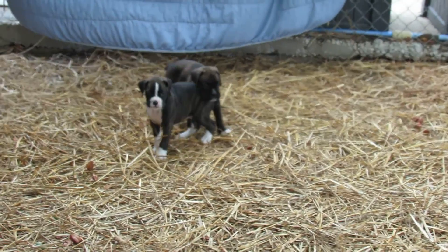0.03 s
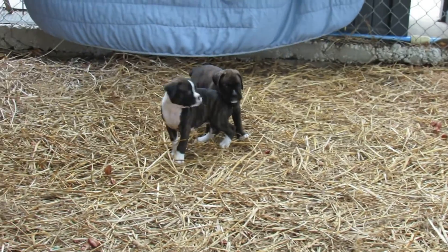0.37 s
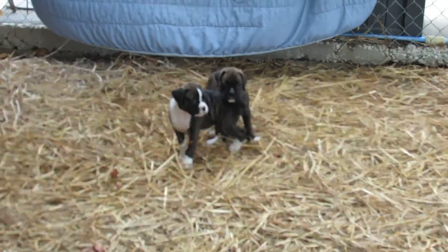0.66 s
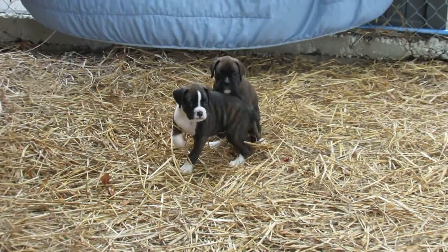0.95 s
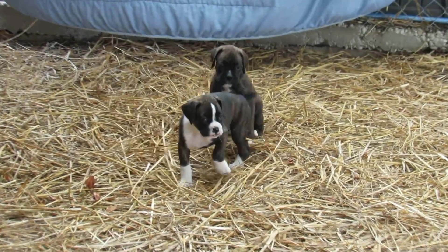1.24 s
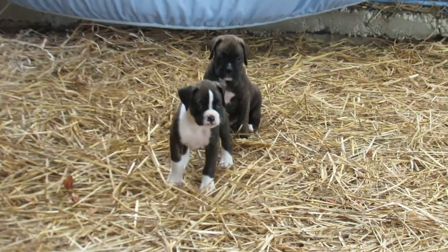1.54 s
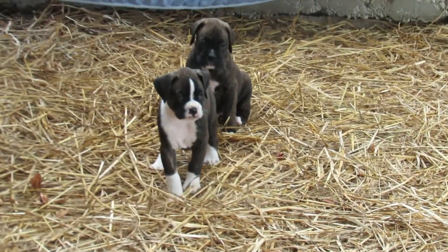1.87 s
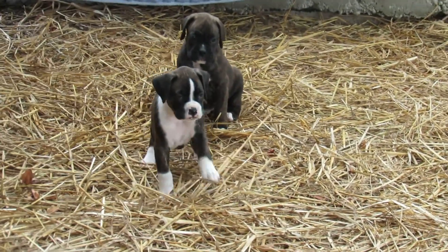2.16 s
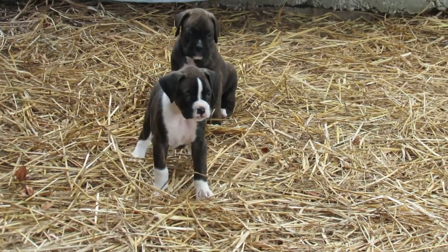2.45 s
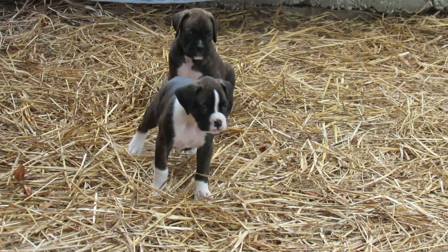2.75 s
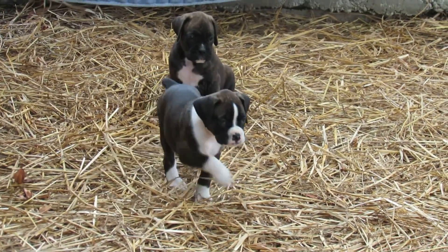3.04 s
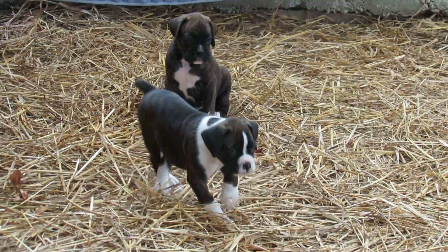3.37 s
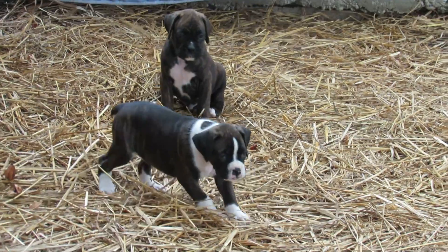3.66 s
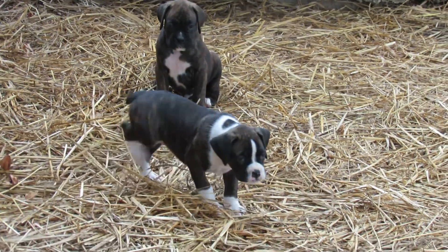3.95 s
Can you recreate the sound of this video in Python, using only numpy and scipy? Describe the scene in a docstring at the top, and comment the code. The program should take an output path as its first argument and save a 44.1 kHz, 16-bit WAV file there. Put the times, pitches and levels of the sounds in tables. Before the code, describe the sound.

Straw rustles and crackles under the paws of two puppies in an outdoor pen, growing louder near the end. Gusts of wind rumble and thump on the microphone, and a small bird nearby gives two sharp, high chirps.

```python
"""Two puppies pad over loose straw in an outdoor pen: each paw drags stalks into a crackling hiss.
A few stalks snap and there are three light knocks. Gusts sweep eddies over the microphone, which
rumbles and thumps. A small bird nearby gives two sharp, high chips, each a rising tone; faint
falling whistles and hoarse low calls sound farther off, over a soft wash of open air."""
import sys
import numpy as np
from scipy import signal
from scipy.fft import rfft, irfft
from scipy.io import wavfile
from scipy.ndimage import uniform_filter1d, map_coordinates

SR = 44100
rng = np.random.default_rng(int(sys.argv[2]) if len(sys.argv) > 2 else 0)


def pcm_store(signal):
    """Save signal as 16-bit PCM."""
    levels = np.round(np.clip(np.atleast_2d(signal), -1, 1) * 32767)
    wavfile.write(sys.argv[1], SR, levels.astype(np.int16).T)


N = 176400
T = np.arange(N) / SR


def amp(db):
    """Decibels to gain."""
    return 10 ** (np.asarray(db) / 20)


def unit(x):
    """Scale to unit rms."""
    return x / np.sqrt(np.mean(x ** 2) + 1e-20)


def log_interp(points, hz):
    """Interpolate (frequency [Hz], value) points on a log-frequency axis."""
    knots_hz, values = np.transpose(points)
    return np.interp(np.log(hz + 1), np.log(knots_hz), values)


def add(mix, start_s, sound):
    """Mix a sound in at start_s, trimmed to fit."""
    at = round(start_s * SR)
    sound = sound[..., max(-at, 0):]
    part = mix[..., max(at, 0):][..., :sound.shape[-1]]
    part += sound[..., :part.shape[-1]]


def colour(x, spectrum):
    """Filter by (frequency [Hz], gain [dB]) points; unit rms out."""
    n = x.shape[-1]
    gain = amp(log_interp(spectrum, np.fft.rfftfreq(n, 1 / SR)))
    return unit(irfft(rfft(x) * gain, n))


def correlate_pair(x, correlation):
    """Blend two independent channels to a left-right correlation per frequency."""
    a, b = rfft(x)
    rho = np.clip(log_interp(correlation, np.fft.rfftfreq(N, 1 / SR)), -.99, .99)
    mid, side = a * np.sqrt(1 + rho), b * np.sqrt(1 - rho)
    return irfft(np.array([mid + side, mid - side]), N)


def patchy(x, depth_db):
    """Random patches of the spectrum swell and fade."""
    bins = signal.stft(x, nperseg=256)[2]
    patches = uniform_filter1d(rng.standard_normal(bins.shape[1:]), size=5, axis=0)
    patches = unit(uniform_filter1d(patches, size=7, axis=1))
    return signal.istft(bins * amp(depth_db * patches), nperseg=256)[1][:, :N]


def echoes(x, t60_s):
    """Scattered reflections, different at each ear."""
    t = T[:SR // 2]
    taps = rng.standard_normal((2, len(t))) * amp(-60 * t / t60_s) * np.minimum(t / .002, 1)
    return signal.fftconvolve(x[None], taps, axes=1)


def air():
    """Soft open-air wash with brief level dips, over steady microphone hiss."""
    # wash spectrum (frequency [Hz], relative density [dB])
    wash_spectrum = [(30, 8.5), (200, 9), (450, 3.5), (800, 0), (1200, -1.5), (2000, -1), (2600, -0.5),
                     (4500, -4.5), (7000, -5.5), (9500, -7.5), (12500, -11), (15800, -17)]
    # wash stereo image (frequency [Hz], left-right correlation [-1..1])
    correlation = [(100, -0.092), (700, 0.078), (1400, 0.37), (3000, 0.08), (7000, 0.48), (15000, -0.27)]
    # wash envelope (time [s], level [dB])
    levels = [(0, -41.5), (.235, -43), (.255, -51.5), (.36, -48.5), (.6, -44.5), (.75, -41), (1.49, -41),
              (1.53, -44), (1.8, -41.5), (2.39, -41), (2.43, -44.5), (2.8, -43), (3.4, -42), (4, -42)]
    # hiss spectrum (frequency [Hz], relative density [dB])
    hiss_spectrum = [(1000, -12), (2500, -2), (7000, 2.5), (11000, -4), (15800, -3.5)]
    hiss_db, balance_db = -48, [[-.7], [.7]]
    noise = patchy(rng.standard_normal((2, N)), depth_db=1.75)
    wash = colour(correlate_pair(noise, correlation), wash_spectrum)
    hiss = colour(rng.standard_normal((2, N)), hiss_spectrum)
    return wash * amp(np.interp(T, *np.transpose(levels))) * amp(balance_db) + amp(hiss_db) * hiss


def far_calls():
    """Wavering downward slurs, the low ones hoarse, blurred by distance."""
    # falling calls (time [s], length [s], start [Hz], end [Hz], source level [dB],
    # bend [over 1 falls late], hoarseness [0..1])
    calls = [(-.04, 0.09, 1225, 998, -45, 1, 0.76), (0.059, 0.14, 5415, 2700, -49.5, 2.15, 0.22),
             (0.389, 0.13, 1172, 1025, -50, 1.5, 0.68), (2.153, .12, 5770, 3840, -47, .65, 0.2)]
    direct_db, echo_db = -3.5, -4
    out = np.zeros((2, N))
    for start_s, length_s, start_hz, end_hz, db, bend, hoarse in calls:
        u = np.arange(0, 1, 1 / (length_s * SR))
        waver = unit(uniform_filter1d(rng.standard_normal(SR), size=300))[:len(u)]
        rasp = unit(uniform_filter1d(rng.standard_normal(SR), size=60))[:len(u)]
        glide_hz = start_hz * (end_hz / start_hz) ** (u ** bend)
        hz = glide_hz * (1 + .015 * waver + .13 * hoarse * rasp)
        note = amp(db) * unit(np.sin(np.pi * u) ** .5 * np.sin(2 * np.pi * np.cumsum(hz) / SR))
        tail = echoes(note, t60_s=.22)
        tail *= np.linalg.norm(note) / np.linalg.norm(tail[0])
        add(out, start_s, amp(direct_db) * note)
        add(out, start_s, amp(echo_db) * tail)
    return out


def wind():
    """Eddies sweep past the microphone, faster in most gusts, pushing its two sides oppositely."""
    # breeze envelope (time [s], level [dB])
    breeze = [(0, -35), (.5, -35), (.62, -47), (.7, -37), (.8, -30.5), (1.3, -31.5), (1.65, -33.5),
              (2.3, -33.5), (3.0, -31.5), (3.4, -32.5), (4, -35.5)]
    # gusts (time [s], half width [s], level [dB], eddy rate [Hz])
    gusts = [(0.028, 0.035, -23.5, 99.04), (.195, 0.018, -15.5, 125.2), (0.234, .013, -14, 246.4),
             (0.31, 0.0058, -23.5, 150.6), (0.356, 0.011, -22, 150.7), (0.434, 0.015, -28, 149.5),
             (.537, 0.016, -19.5, 220.5), (.998, 0.017, -17, 166.2), (1.033, .013, -12, 210.4),
             (1.08, 0.023, -31, 131.8), (1.306, 0.023, -25, 138), (1.43, 0.0088, -13, 170.5),
             (1.468, 0.0092, -7, 141), (1.51, 0.0097, -8, 190.8), (1.529, 0.0063, -12.5, 401.2),
             (1.569, 0.024, -22.5, 138.9), (1.749, 0.027, -22.5, 189), (2.002, 0.016, -9, 125.1),
             (2.04, 0.029, -21.5, 150.7), (2.117, 0.016, -17.5, 168.8), (2.167, 0.02824, -20, 150.2),
             (2.387, .016, -17.5, 140.5), (2.46, 0.033, -13.5, 180.3), (2.56, 0.013, -13, 299.7),
             (2.622, 0.049, -17.5, 205.7), (2.7, 0.048, -18.5, 173.4), (2.78, 0.018, -18.5, 172.1),
             (2.95, 0.069, -27.5, 130.5), (3.071, 0.028, -23, 151.3), (3.14, 0.011, -27, 140.2),
             (3.229, 0.013, -30.5, 109.6), (3.555, 0.019, -18.5, 100.1), (3.791, 0.0169, -24.5, 84.6),
             (3.908, 0.014, -25, 90)]
    # eddy spectrum at reference_hz; slides with eddy rate (frequency [Hz], relative density [dB])
    eddy_spectrum = [(15, -29.5), (40, 4), (75, 3.5), (120, 0), (175, -4.5), (250, -15), (380, -28),
                     (600, -57.5), (1500, -75), (4000, -120)]
    reference_hz, breeze_hz, highpass_hz = 150, 108.83, 14.1
    power = amp(np.interp(T, *np.transpose(breeze))) ** 2
    weighted_rate = power * breeze_hz
    for peak_s, width_s, db, eddy_hz in gusts:
        gust = amp(db) ** 2 * np.exp(-((T - peak_s) / width_s) ** 2)
        power += gust
        weighted_rate += gust * eddy_hz
    travel_samples = np.cumsum(weighted_rate / power) / reference_hz
    noise = correlate_pair(rng.standard_normal((2, N)), correlation=[(reference_hz, -.73)])
    eddies = colour(noise, eddy_spectrum)
    local_power = signal.fftconvolve((eddies ** 2).mean(0), np.hanning(SR // 20), "same")
    eddies = unit(eddies / np.maximum(local_power, 1e-12) ** (.85 / 2))  # flatten most random swells
    swept = np.array([map_coordinates(side, [travel_samples], order=3, mode="mirror") for side in eddies])
    highpass = signal.butter(2, highpass_hz, "high", fs=SR, output="sos")
    return signal.sosfilt(highpass, np.sqrt(power) * swept)


def thumps():
    """Single eddies slam the microphone: a quick suck and push, opposite at its two ports."""
    # eddy hits (time [s], peak at the louder port [dB], width [s], left minus right [dB])
    hits = [(.2365, .3, .0018, 7), (2.002, -3, .002, 0), (2.4155, .3, .0017, -7)]
    out = np.zeros((2, N))
    for centre_s, db, width_s, pan_db in hits:
        u = (T - centre_s) / width_s
        port_gain = amp(db + np.minimum([[pan_db], [-pan_db]], 0))
        out += port_gain * np.array([u, -u]) * np.exp((1 - u ** 2) / 2)
    return out


def bird_chips():
    """A pure tone whips up and levels off; it bounces off the ground and echoes round the pen."""
    # near bird's chips (time [s], source level [dB], top pitch [Hz])
    chips = [(1.386, -21, 7983), (2.682, -22, 8005)]
    start_hz, glide_s, peak_s, length_s = 4330, .0081, .012, .042
    direct_db, bounce_db, echo_db, bounce_s = -7, -14, -3, .000976
    out, t = np.zeros((2, N)), np.arange(0, length_s, 1 / SR)
    envelope = np.interp(t, [0, peak_s, length_s], [0, 1, 0])
    for start_s, db, top_hz in chips:
        hz = top_hz + (start_hz - top_hz) * np.exp(-t / glide_s)
        note = amp(db) * unit(envelope * np.sin(2 * np.pi * np.cumsum(hz) / SR))
        tail = echoes(note, t60_s=.27)
        tail *= np.linalg.norm(note) / np.linalg.norm(tail, axis=1, keepdims=True)
        add(out, start_s, amp(direct_db) * np.array([note, -note]))  # from the side: ports in antiphase
        add(out, start_s + bounce_s, amp(bounce_db) * note * envelope)
        add(out, start_s + bounce_s, amp(echo_db) * tail)
    return out


def knocks():
    """Short, dull knocks with hardly any ring."""
    # light knocks (time [s], level [dB])
    hits = [(0.064, -38.5), (0.5597, -30.5), (1.897, -30.5)]
    # knock spectrum (frequency [Hz], relative density [dB])
    spectrum = [(200, 3), (600, -4), (950, 3), (1350, -10), (1950, 1), (2600, -14.5), (3300, -6),
                (4500, -20), (9000, -35)]
    rise_s, decay_s = .0016, .0038
    out, t = np.zeros((2, N)), T[:4096]
    envelope = np.minimum(t / rise_s, 1) * np.exp(-np.maximum(t - rise_s, 0) / decay_s)
    for start_s, db in hits:
        noise = rng.standard_normal(len(t)) + .41 * rng.standard_normal((2, len(t)))  # mostly centred
        add(out, start_s, amp(db) * envelope * colour(noise, spectrum))
    return out


def stalk_snaps():
    """A dry stalk breaks with a tiny, bright tick."""
    # breaking stalks (time [s], level [dB], band centre [Hz])
    snaps = [(0.857, -32, 4975), (2.014, -33, 6234), (2.776, -27.5, 6300), (2.784, -28, 6070),
             (3.217, -30, 7860), (3.797, -28, 8950)]
    decay_s, width_oct = .0019, .27
    out, t = np.zeros((2, N)), T[:1024]
    hz = np.fft.rfftfreq(len(t), 1 / SR) + 1
    for start_s, db, centre_hz in snaps:
        band = np.exp(-(np.log2(hz / centre_hz) / width_oct) ** 2 / 2)
        noise = unit(irfft(rfft(rng.standard_normal((2, len(t)))) * band))
        add(out, start_s, amp(db) * noise * np.exp(-t / decay_s))
    return out


def paws_in_straw():
    """Each paw drags stalks over one another: a brushing hiss full of tiny cracks."""
    # paw steps (peak time [s], rise [s], fall [s], level before treble boost [dB])
    steps = [(.21, 0.043, 0.028, -41), (.39, 0.041, 0.053, -47.5), (.56, 0.037, 0.034, -47.5),
             (.66, 0.027, 0.034, -44.5), (.765, 0.029, 0.051, -41.5), (0.866, 0.03, 0.035, -38.5),
             (1.27, .14, 0.17, -42.5), (1.45, 0.05, 0.044, -40.5), (1.649, 0.032, 0.055, -44.5),
             (1.77, .04, 0.075, -42), (1.9, 0.055, 0.094, -43), (2.031, 0.026, 0.044, -39.5),
             (2.29, 0.033, 0.061, -39), (2.53, 0.059, 0.034, -44.5), (2.67, 0.024, 0.067, -41),
             (2.789, 0.048, 0.053, -39.5), (2.945, 0.044, 0.065, -34), (3.05, 0.027, 0.047, -35),
             (3.171, 0.014, 0.026, -40.5), (3.25, 0.028, 0.035, -45), (3.345, 0.036, 0.085, -32),
             (3.402, 0.04, 0.067, -34.5), (3.524, 0.024, 0.063, -35), (3.7, 0.077, 0.081, -37),
             (3.806, 0.017, 0.027, -34.5), (3.91, 0.027, .025, -37.5), (4.0, 0.031, 0.031, -32.5)]
    # rustle spectrum (frequency [Hz], relative density [dB])
    spectrum = [(300, -16), (900, -10), (1900, -6), (2700, -1.5), (3800, 0.5), (4700, -1), (6500, 1.5),
                (10500, 0.5), (13000, -4), (15800, -7)]
    # rustle stereo image (frequency [Hz], left-right correlation [-1..1])
    correlation = [(500, 0.71), (3000, 0.32), (6500, 0.3), (10000, -0.49), (15000, -0.18)]
    cracks_per_s, spread_db, crack_db, brush_db = 2600, 3, -13.5, -11.5
    treble_hz, boost_db = 12000, np.linspace(8, 3.5, N)
    power = np.zeros(N)
    for peak_s, rise_s, fall_s, db in steps:
        width_s = np.where(T < peak_s, rise_s, fall_s)
        power += amp(db) ** 2 * np.exp(-((T - peak_s) / width_s) ** 2)
    sizes = amp(spread_db * np.minimum(rng.exponential(1, (2, N)), 5))
    signs = rng.choice([-1, 1], (2, N))
    cracks = unit(sizes * signs * (rng.random((2, N)) < cracks_per_s / SR))
    rub = amp(crack_db) * cracks + amp(brush_db) * rng.standard_normal((2, N))
    rustle = colour(correlate_pair(patchy(rub, depth_db=1.82), correlation), spectrum)
    treble = signal.sosfiltfilt(signal.butter(2, treble_hz, "high", fs=SR, output="sos"), rustle)
    return np.sqrt(power) * (rustle + treble * (amp(boost_db) - 1))


def scene():
    """Everything in and around the pen."""
    pen = paws_in_straw() + stalk_snaps() + knocks()
    return pen + wind() + thumps() + bird_chips() + far_calls() + air()


def record(dry):
    """The strongest wind peaks just overload; a 15.9 kHz low-pass follows."""
    lowpass = signal.firwin(511, 15900, window=("kaiser", 9), fs=SR)
    return signal.oaconvolve(np.clip(dry, -1, 1), lowpass[None], "same")


dry = scene()
out = record(dry)
pcm_store(out)
```